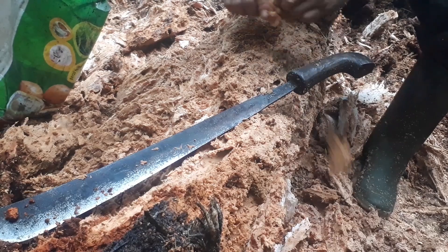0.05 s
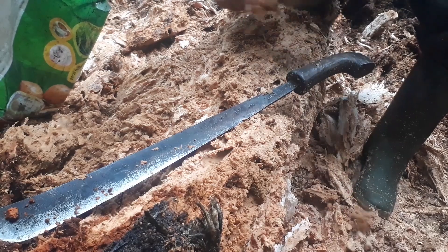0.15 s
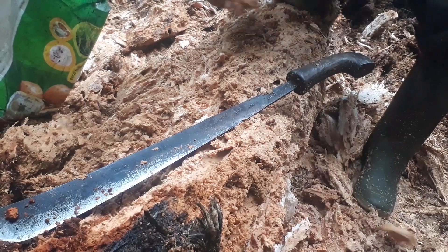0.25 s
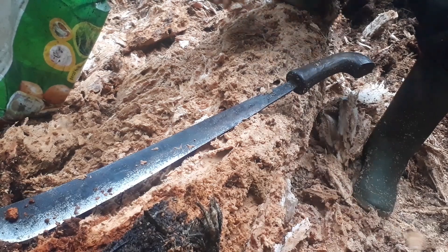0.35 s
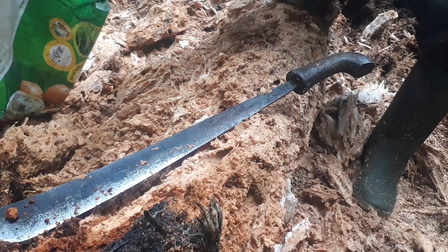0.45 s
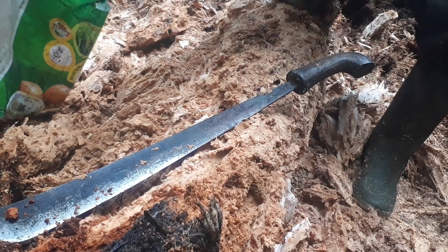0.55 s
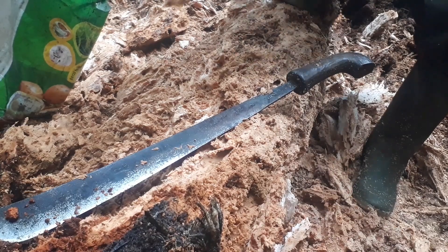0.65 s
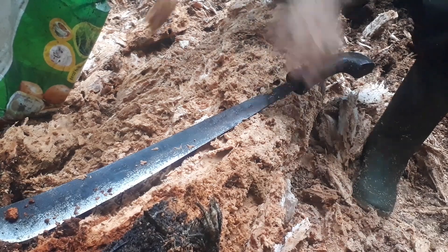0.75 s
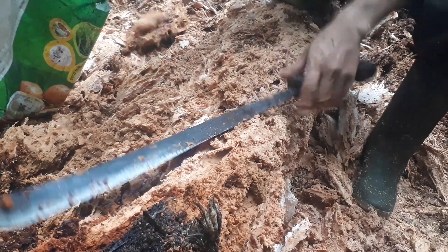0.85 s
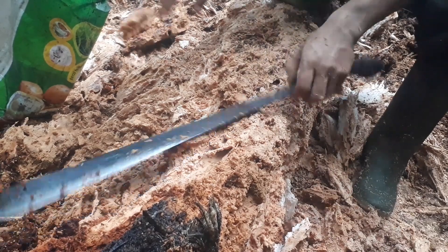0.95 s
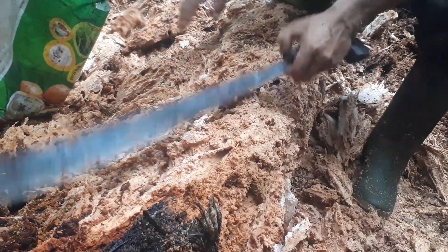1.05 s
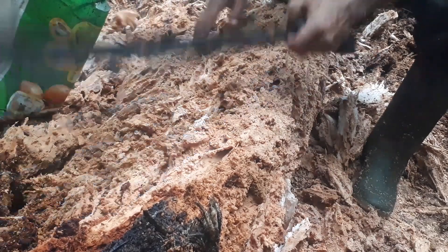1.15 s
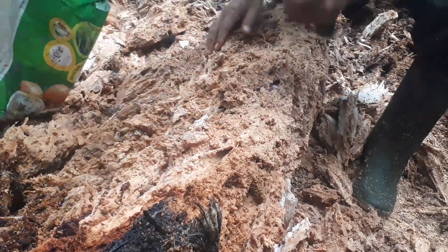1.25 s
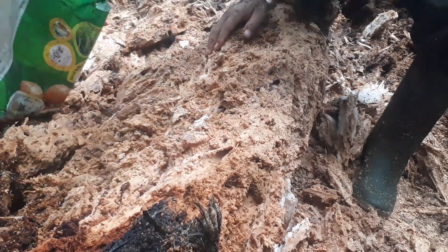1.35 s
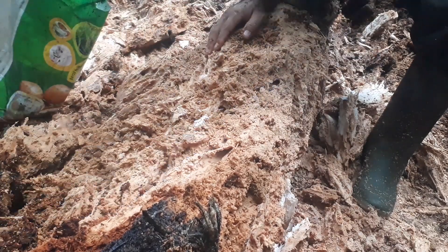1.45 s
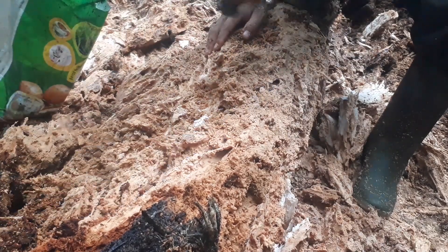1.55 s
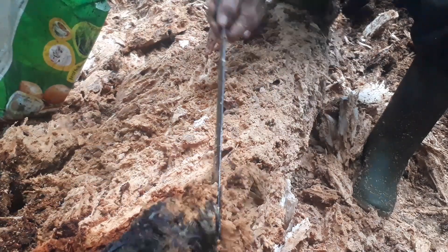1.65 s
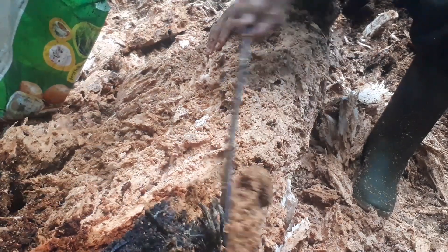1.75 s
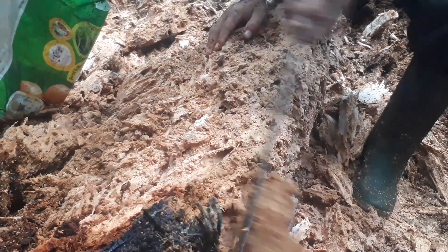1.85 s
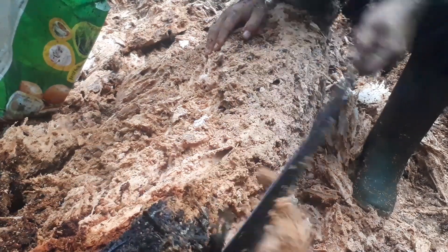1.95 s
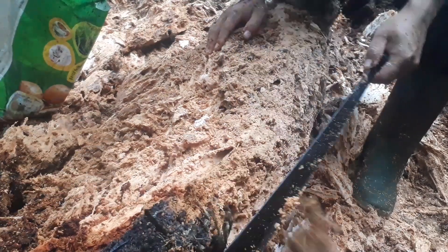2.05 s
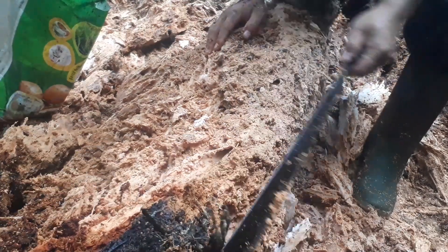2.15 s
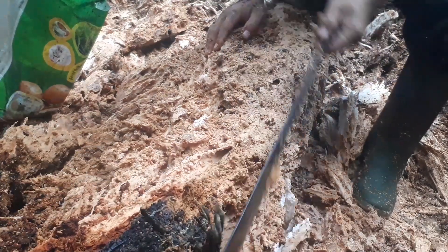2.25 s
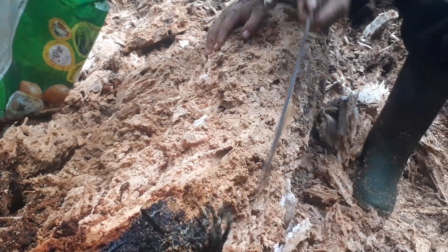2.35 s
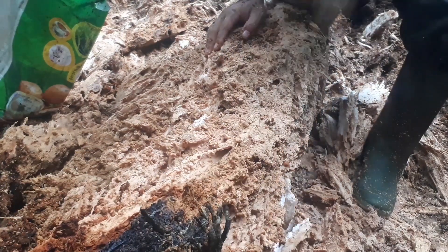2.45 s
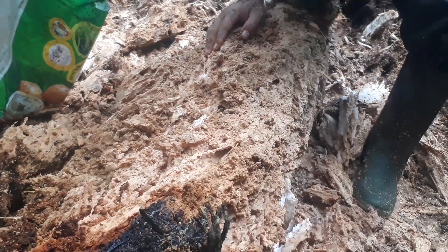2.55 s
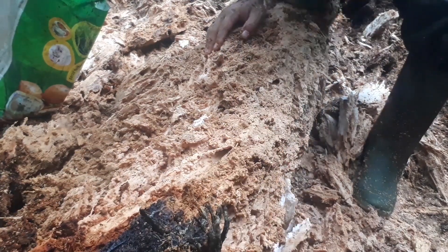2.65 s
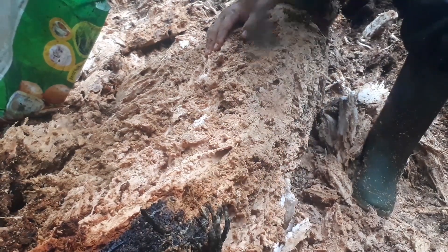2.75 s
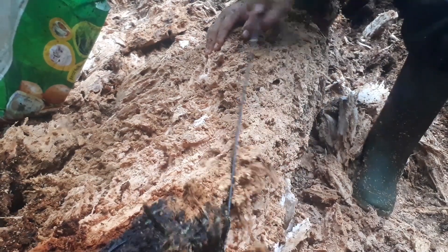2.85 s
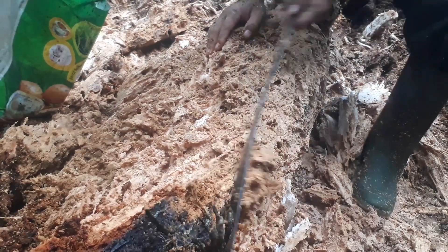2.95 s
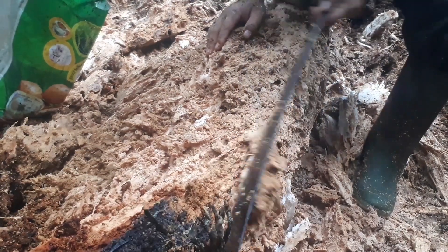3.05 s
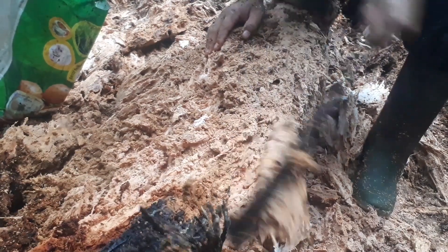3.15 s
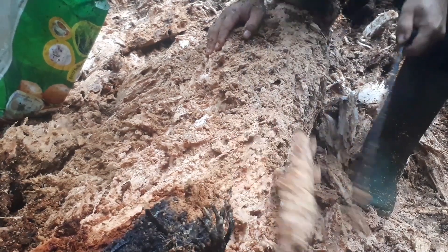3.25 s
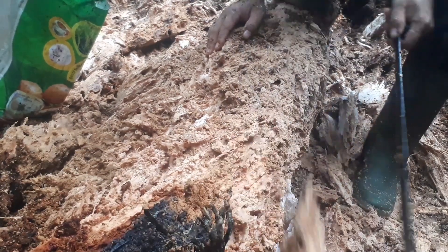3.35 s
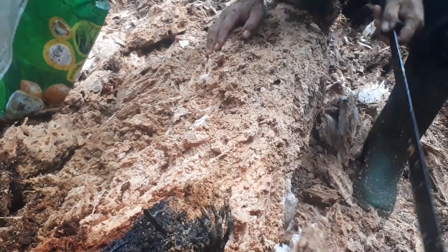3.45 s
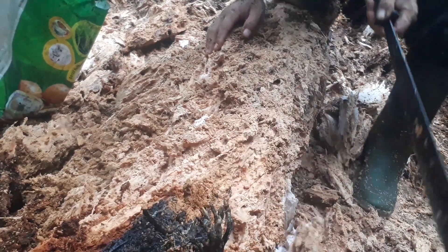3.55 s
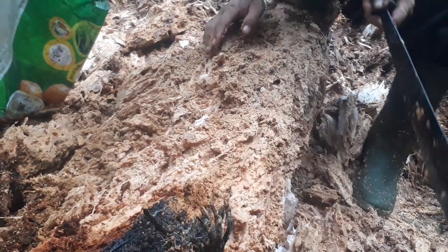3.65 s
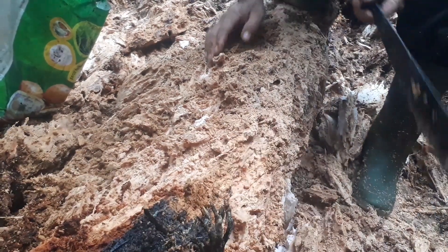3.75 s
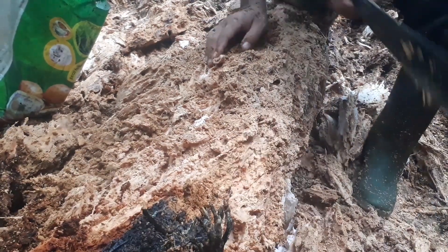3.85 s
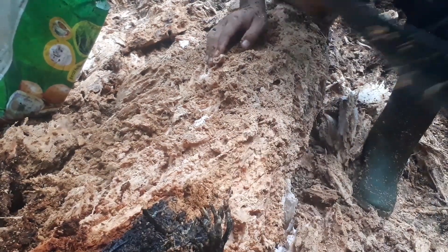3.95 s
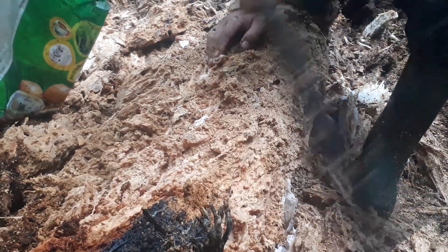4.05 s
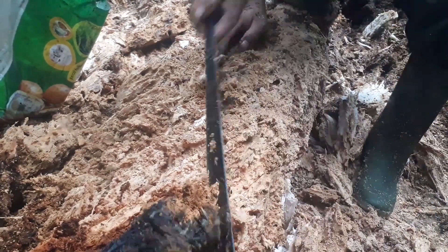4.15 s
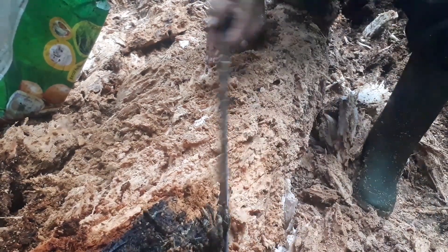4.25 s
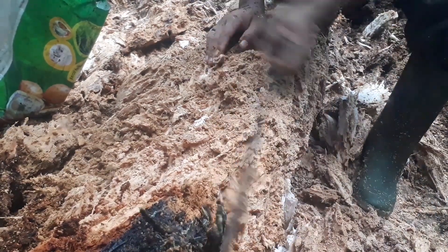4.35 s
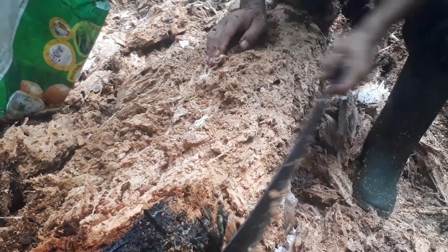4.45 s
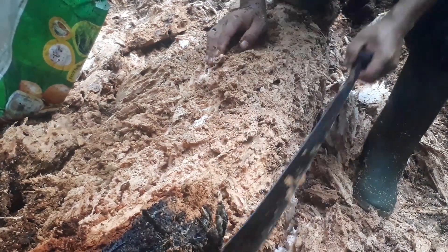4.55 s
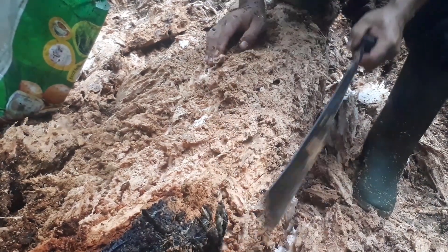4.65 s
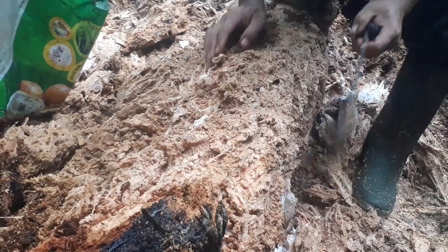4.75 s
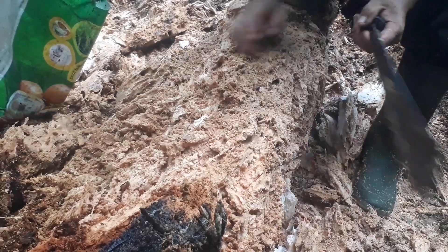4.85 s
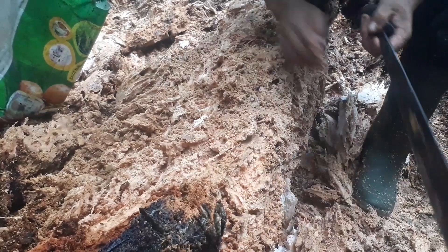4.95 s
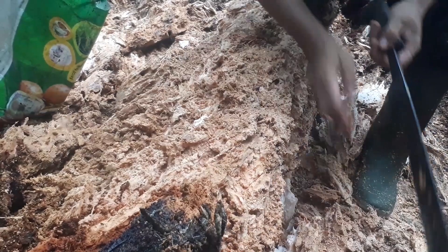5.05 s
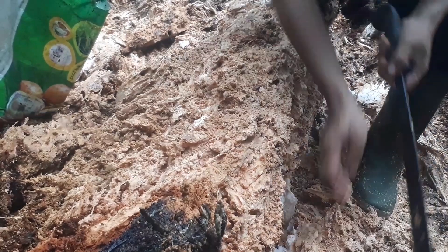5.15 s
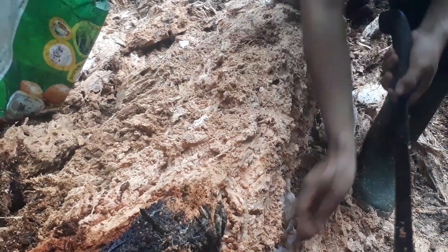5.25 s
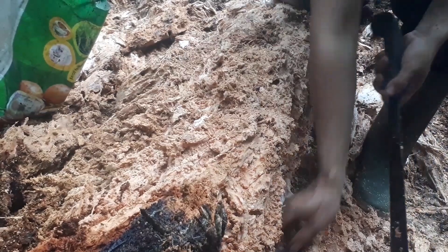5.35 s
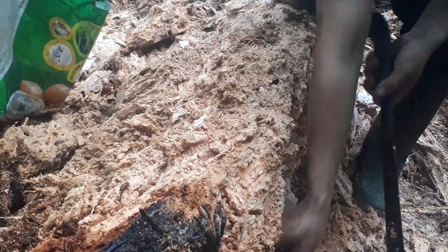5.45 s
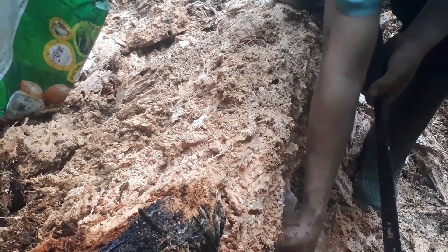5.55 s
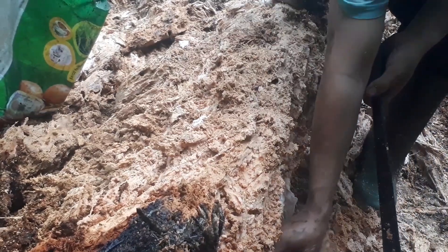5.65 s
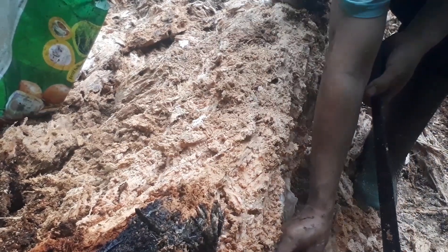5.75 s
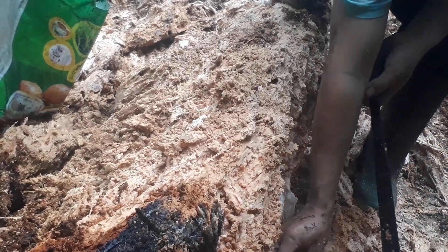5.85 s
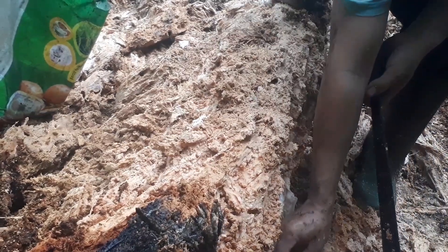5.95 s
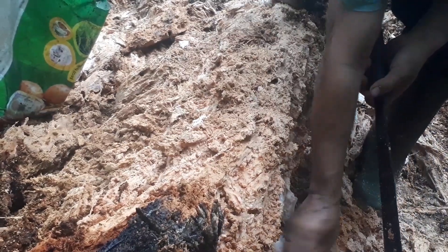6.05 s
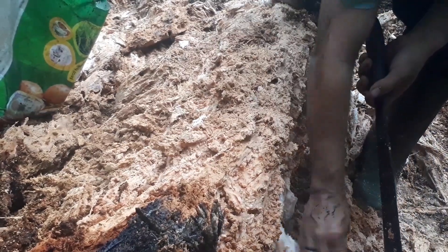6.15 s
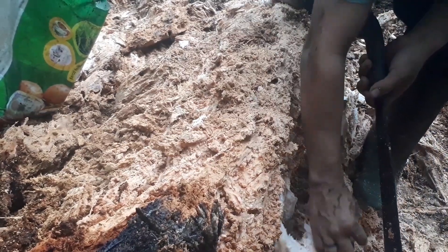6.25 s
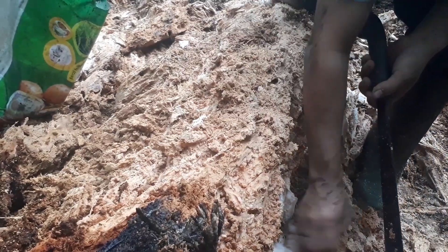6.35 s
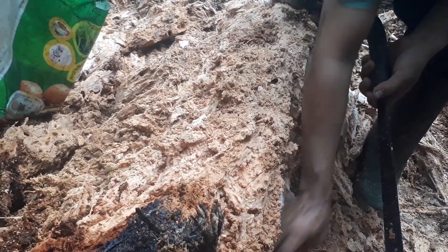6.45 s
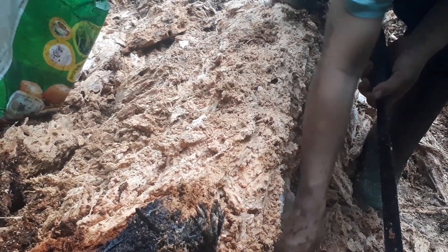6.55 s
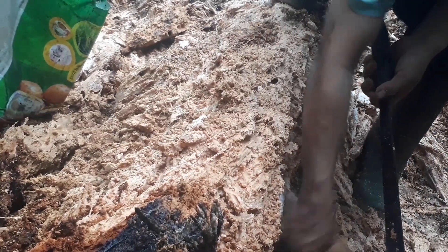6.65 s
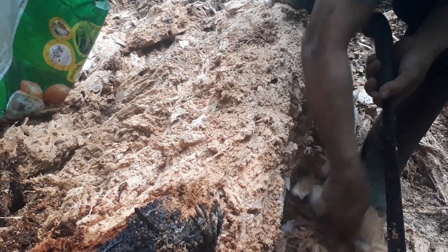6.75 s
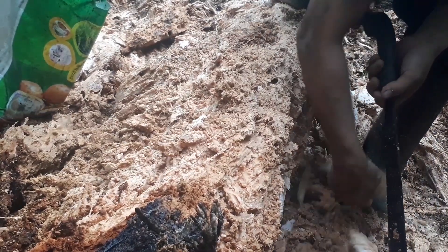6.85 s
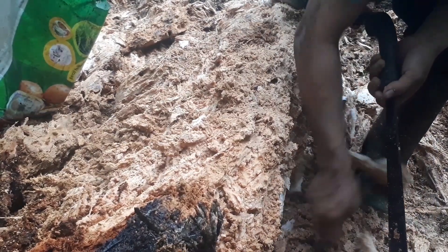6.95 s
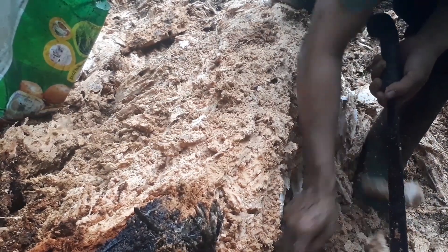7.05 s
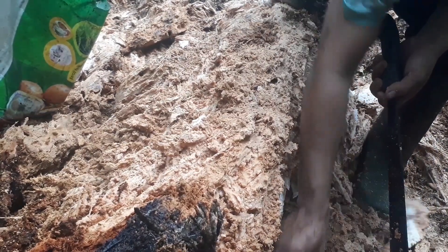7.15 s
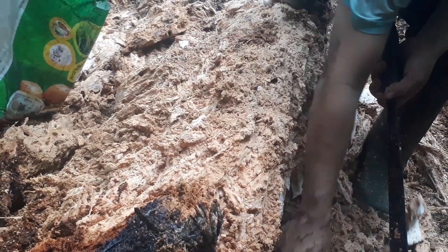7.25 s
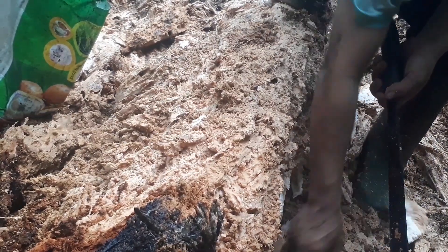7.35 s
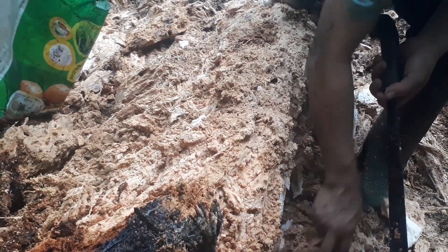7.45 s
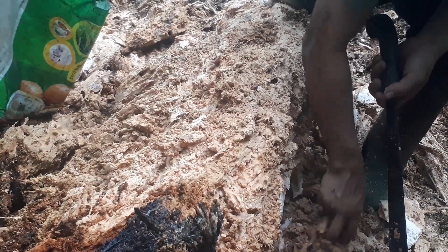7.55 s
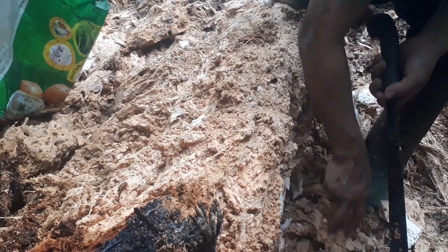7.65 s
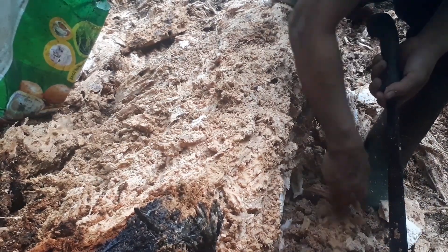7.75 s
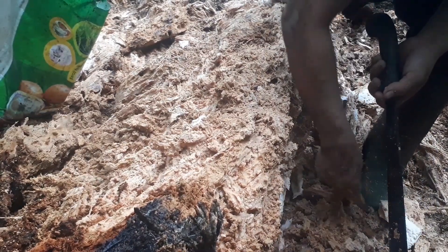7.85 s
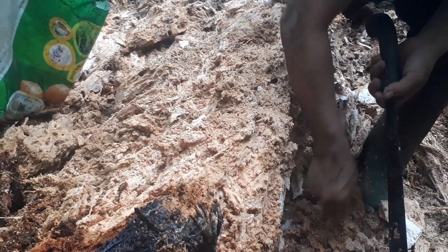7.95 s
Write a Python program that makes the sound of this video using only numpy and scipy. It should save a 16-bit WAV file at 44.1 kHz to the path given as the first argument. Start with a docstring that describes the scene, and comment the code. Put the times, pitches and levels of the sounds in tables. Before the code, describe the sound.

Close stereo pickup of soggy trunk being cut. Three short, squelchy chops come a little over a second apart, each ending in a low damped thump. Levering after the first two breaks fibres in dense dry-edged cracks; the last barely crackles. Small debris ticks before and between, and soft crumbling, rubbing and light bumps follow. A quiet forest wash, fine drips and a thin shrill insect band lie behind, with little echo.

```python
"""Wet forest: a machete is driven three times into a rotten palm trunk and levered until the fibres snap.
Chops are shaped noise plus damped trunk modes; snaps are cracks with short knocks; tearing is dense grains.
Ticks and bumps of debris, a hand rummaging (swelling grains) and scraping (narrow resonance) surround them.
Behind lie a filtered-noise wash with fine drips, a high insect band and one faint far tone."""
import sys
import numpy as np
from scipy import signal
from scipy.fft import rfft, irfft, next_fast_len
from scipy.io import wavfile

SR = 44100
rng = np.random.default_rng(int(sys.argv[2]) if len(sys.argv) > 2 else 0)


def master(y):
    """Save y as 16-bit WAV."""
    cut = np.clip(np.atleast_2d(y).T, -1, 1)
    pcm = np.round(cut * 32767)  # scale
    wavfile.write(sys.argv[1], SR, pcm.astype(np.int16))


N = 351918
TIME = np.arange(N) / SR

# blade sinks in: (time [s], length [s], crunch [dB], entry pitch [Hz], rest pitch [Hz], fizz [dB],
# blade ring re drag [dB], thud time [s], thud [dB], thud pitch [factor])
CHOP_EVENTS = [(1.7001, .021, -24, 1820, 1140, -38.5, -27, 1.7145, -22.5, 0.986),
               (2.8486, 0.014, -24, 2360, 1120, -33.5, -24, 2.858, -22, 1.07),
               (4.198, .013, -26, 2020, 1520, -35, -31.5, 4.2075, -21.5, 0.984)]
# levering after each chop: (pith gives at [s], tearing goes on for [s], tearing [dB before trim],
# build-up [dB/s], crumb trickle [dB before trim])
PRY_EVENTS = [(1.866, 0.025, -32, 270, -41.5), (3.03, .15, -37.5, 258, -58.5),
              (4.388, 0.0064, -43.5, 900, -47.5)]
# thick fibres break: (time [s], knock [dB before trim], knock pitch [Hz], crack [dB before trim])
SNAP_EVENTS = [(1.8097, -28, 1540, -58), (1.8346, -26, 1280, -43), (1.838, -21, 1290, -41),
               (1.8511, -22.5, 1300, -48), (1.8612, -17, 4870, -36), (1.8634, -16, 1620, -38),
               (1.8756, -16, 4800, -33), (1.8892, -15.5, 1580, -24.5), (1.9209, -17, 1420, -39),
               (1.927, -22, 2130, -34), (1.9481, -17.5, 1670, -30.5), (1.9869, -23, 1620, -32.5),
               (1.9908, -24, 2190, -42), (1.9956, -21.5, 2150, -35.5), (2.988, -25, 3100, -37),
               (3, -26, 3100, -33), (3.005, -17.5, 3320, -34), (3.0255, -13.5, 3150, -37),
               (3.038, -16, 3200, -27), (3.0474, -30, 3140, -22), (3.0634, -21, 3400, -34),
               (3.0744, -20, 3300, -29), (3.0877, -15, 1290, -22.5), (3.1014, -14.5, 3600, -22),
               (3.1091, -16, 2130, -27), (3.127, -17, 1890, -19.5), (3.1374, -25, 2690, -27),
               (3.1482, -23, 2020, -28.5), (3.1616, -18, 3050, -25), (3.171, -23, 2500, -27.5),
               (3.1791, -33, 1530, -31), (4.3852, -33, 3980, -31.5), (4.3965, -38, 3500, -30.5),
               (4.4201, -34, 4100, -33.5)]
# spectrum of splitting fizz and bright tick edges: (frequency [Hz], relative level [dB])
FIZZ_SPECTRUM = [(1200, 0.5), (2500, 8), (4500, 3.5), (6500, 0), (10000, 2.5), (15500, -9)]
# spectrum of torn pith: (frequency [Hz], relative level [dB])
PITH_SPECTRUM = [(40, -32), (120, -19), (250, -2.5), (450, -5.5), (650, 0), (1500, 0.5), (3200, 0.5),
                 (4500, -6.5), (7000, -10.5), (12000, -11.5), (16000, -22)]
# spectrum of crumbs and drips: (frequency [Hz], relative level [dB])
CRUMBLE_SPECTRUM = [(500, -21), (1500, -6), (2600, 1), (4000, -7), (6000, -12), (12000, -12.5),
                    (16000, -22.5)]
# spectrum of dull rubbing: (frequency [Hz], relative level [dB])
RUB_SPECTRUM = [(120, -17.5), (300, -1), (480, -15.5), (640, 3), (900, -2.5), (1400, 1), (2000, -5),
                (4000, -36.5)]
# left-right likeness of far sounds: (frequency [Hz], likeness [0-1])
FAR_LIKENESS = [(60, 0.56), (250, 0.84), (640, 0.37), (1400, 0), (3000, 0), (8000, 0.21)]


def gain_of(db):
    """Decibels to amplitude."""
    return 10 ** (np.asarray(db) / 20)


def evened(x):
    """Scales to rms 1."""
    return x / np.sqrt(np.mean(x ** 2) + 1e-20)


def read(points, hz):
    """Interpolates a table on a logarithmic frequency axis."""
    f, value = np.transpose(points)
    return np.interp(np.log(hz + 1), np.log(f + 1), value)


def add(mix, s, sound):
    """Mixes a sound in at time s, cut at the end of the mix."""
    part = mix[:, max(round(s * SR), 0):][:, :sound.shape[-1]]
    part += sound[..., :part.shape[1]]


def high_pass(x, hz):
    """Second-order removal of the bass below hz."""
    return signal.sosfilt(signal.butter(2, hz, "highpass", fs=SR, output="sos"), x)


def colour(x, spectrum):
    """Minimum-phase filter of unit energy with the given spectrum."""
    size = 2048
    log_gain = np.log(gain_of(read(spectrum, abs(np.fft.fftfreq(size, 1 / SR)))))
    taps = np.fft.ifft(np.exp(np.conj(signal.hilbert(log_gain)))).real
    return signal.oaconvolve(x, taps[None] / np.linalg.norm(taps), axes=1)[:, :x.shape[1]]


def resonate(x, hz, width_hz):
    """One-pole resonance in a rotating frame, so that its pitch can move."""
    turn = np.exp(2j * np.pi * np.cumsum(hz * np.ones(x.shape[1])) / SR)
    r = np.exp(-np.pi * width_hz / SR)
    return (turn * signal.lfilter([1 - r], [1, -r], x / turn)).real


def pair(x, likeness):
    """Blends two unrelated signals into left and right that are partly alike."""
    size = next_fast_len(x.shape[1])
    same = np.clip(read(likeness, np.fft.rfftfreq(size, 1 / SR)), 0, .995)
    mid, side = rfft(x, size)
    side = side * np.sqrt((1 - same) / (1 + same))
    return irfft([mid + side, mid - side], size)[:, :x.shape[1]]


def hiss(size, likeness=None):
    """White noise at the two microphones, near unless a likeness is given."""
    # left-right likeness of near sounds: (frequency [Hz], likeness [0-1])
    near_likeness = [(200, .99), (700, .98), (1300, .95), (2500, .82), (5000, .62), (12000, .52)]
    return pair(rng.standard_normal((2, size)), near_likeness if likeness is None else likeness)


def drift(size, per_s):
    """Random wander of rms 1: straight lines between per_s random knots a second."""
    knots = rng.standard_normal(int(size / SR * per_s) + 4)
    return evened(np.interp(np.arange(size) / SR * per_s, np.arange(len(knots)), knots))


def grains(per_s, spread_db, life_s):
    """Tiny noise bursts at random moments, mostly small and a few large."""
    sizes_db = spread_db * np.minimum(rng.exponential(1, N), 3.5)
    clicks = (rng.random(N) < per_s / SR) * gain_of(sizes_db)
    power = signal.lfilter([1], [1, -np.exp(-2 / (life_s * SR))], clicks ** 2)
    return evened(np.sqrt(power)) * hiss(N)


def swell(peak_s, length_s, rise=0.46):
    """Smooth rise (a share of the length) and fall: 1 at the peak, about 9 dB down at the ends."""
    after = (TIME - peak_s) / length_s
    return np.exp(-np.minimum((after / np.where(after < 0, rise, 1 - rise)) ** 2, 20))


def held(s, hold_s, rise_db_per_s, fall_db_per_s):
    """Envelope that builds up to 1 at time s, holds, and dies away."""
    before_s = np.maximum(s - TIME, 0)
    after_s = np.maximum(TIME - s - hold_s, 0)
    return gain_of(-rise_db_per_s * before_s - fall_db_per_s * after_s)


def forest(wash_db=-63, waver_db=1.34, drip_db=-73):
    """Distant wash of wavering coloured noise, and fine drizzle on leaves as sparse grains."""
    # spectrum of the wash: (frequency [Hz], relative level [dB])
    wash_spectrum = [(20, -12), (50, -6.5), (110, 3.5), (200, -3.5), (480, -6), (900, -7), (1400, -2.5),
                     (1700, -7), (2050, -1.5), (3000, -5), (5000, -9.5), (11500, -14.5), (14000, -18),
                     (16000, -35)]
    wash = colour(hiss(N, FAR_LIKENESS), wash_spectrum) * gain_of(wash_db + waver_db * drift(N, per_s=7))
    drops = grains(per_s=120, spread_db=3, life_s=.001)
    return wash + gain_of(drip_db) * colour(drops, CRUMBLE_SPECTRUM)


def insects(chorus_db=-64.5, rest_db=-1.5, shrill_db=-68, shrill_hz=9170, sag_hz=400):
    """High band of many insects; the shrillest sag in pitch as the chorus eases off, and slowly recover."""
    # spectrum of the chorus: (frequency [Hz], relative level [dB])
    chorus_spectrum = [(6000, -35.5), (6850, -15), (7080, -1.5), (7300, -7), (7700, 0), (8150, 1),
                       (8600, -1), (9000, -2), (9250, -7), (9420, -12), (9600, -20), (10500, -40)]
    # insects ease off: (deepest at [s], length [s])
    rests = [(.2, 1.05), (4.25, 1.05)]
    rest = sum(swell(s, length_s, rise=0.28) for s, length_s in rests)
    chorus = gain_of(chorus_db) * colour(hiss(N, FAR_LIKENESS), chorus_spectrum)
    shrill = hiss(N, FAR_LIKENESS)
    for _ in range(3):  # cascade steepens the skirts
        shrill = resonate(shrill, shrill_hz - sag_hz * rest, width_hz=560)
    level = gain_of(rest_db * rest + 0.83 * drift(N, per_s=28))
    return (chorus + gain_of(shrill_db) * evened(shrill)) * level


def thud(pitch, push_s=0.0023):
    """The damp trunk is pushed away and swings in its low, damped modes."""
    # trunk modes: (frequency at pitch factor 1 [Hz], level [dB], t60 [s])
    trunk_modes = [(76, -20.5, 0.15), (140.3, -4, 0.078), (162, -6.5, 0.065), (195.6, -6.5, 0.085),
                   (278, -1.5, 0.069), (342, -8.5, 0.1), (378, -6, 0.057), (563, -13, 0.039)]
    t = np.arange(SR // 4) / SR
    modes = sum(gain_of(db - 60 * t / t60_s) * np.sin(2 * np.pi * hz * pitch * t)
                for hz, db, t60_s in trunk_modes)
    return high_pass(-modes * (1 - np.exp(-t / push_s)), 55)


def debris(dull_db=-12):
    """Crumbs and twigs tick (decaying resonant noise); heavier chunks bump softly (slow-pushed thuds)."""
    # crumbs and twigs: (time [s], level [dB], pitch [Hz], t60 [s], bright edge re level [dB])
    ticks = [(.309, -47.5, 2900, 0.063, -10), (0.4386, -40, 2680, 0.042, -14),
             (.622, -32.5, 2620, 0.026, -5), (1.3266, -49.5, 2780, 0.058, -6),
             (2.888, -38, 2200, 0.022, -3), (4.463, -47.5, 1600, 0.064, -6), (5.32, -48.5, 1890, 0.085, 5),
             (5.746, -44, 7100, 0.015, -11), (6.586, -52, 1270, 0.05, 0), (6.83, -56, 6200, 0.072, 3),
             (6.975, -53, 2190, .046, -9), (7.193, -53.5, 1090, 0.13, -12), (7.709, -48, 2590, 0.02, 2),
             (7.852, -46, 860, 0.07, -3.5), (7.895, -42.5, 1120, 0.031, -5)]
    # chunks land, the hand bumps the heap: (time [s], level [dB], pitch [factor])
    bumps = [(0.626, -50, 1.34), (3.471, -50, 1), (5.322, -39, 1.05), (5.352, -49, 1.4), (6.367, -48, 1.13),
             (6.581, -49, 0.98), (6.999, -48.5, 1.11), (7.142, -47, 0.62), (7.213, -49, .68)]
    out, t = np.zeros((2, N)), np.arange(SR // 8) / SR
    for s, db, hz, t60_s, bright_db in ticks:
        body = evened(high_pass(resonate(hiss(len(t)), hz, width_hz=0.25 * hz), hz / 2))
        edge = colour(hiss(len(t)), FIZZ_SPECTRUM)
        dull = colour(hiss(len(t)), RUB_SPECTRUM)
        tick = body + gain_of(bright_db) * edge + gain_of(dull_db) * dull
        add(out, s, gain_of(db - 60 * t / t60_s) * tick)
    for s, db, pitch in bumps:
        add(out, s, gain_of(db) * thud(pitch, push_s=0.0062))
    return out


def rummaging(crumble_trim_db=-1, rub_trim_db=-1.0, idle_crumble_db=-70, idle_rub_db=-74,
              clump_db=2.5, flake_db=-7):
    """Loose pith crumbles, rubs and flakes with each stroke; the heap is never quite still."""
    # hand or boot stirs the pith: (strongest at [s], length [s], crumbling [dB before trim],
    # dull rubbing [dB before trim])
    strokes = [(0.344, 0.13, -56.5, -61), (.46, 0.1, -61, -63.5), (.65, 0.11, -56, -59),
               (.83, 0.15, -62, -64), (1.032, 0.044, -63.5, -77), (1.374, 0.13, -62.5, -70),
               (2.428, 0.069, -61.5, -67), (3.277, .2, -62.5, -66.5), (3.477, 0.068, -59.5, -63.5),
               (3.75, 0.14, -58.5, -67), (3.83, 0.059, -63, -66), (3.949, 0.11, -58, -59.5),
               (4.495, .1, -58, -74), (4.952, 0.45, -66.5, -70), (5.327, 0.088, -58, -65),
               (5.62, 0.33, -65, -69), (5.896, 0.14, -63, -63), (6.325, 0.11, -61, -67),
               (6.475, 0.19, -59, -65.5), (6.596, 0.17, -59.5, -61.5), (6.8, 0.23, -61, -65.5),
               (6.96, 0.06, -62, -73), (7.61, 0.079, -65, -66), (7.897, 0.13, -57, -57.5)]
    crumbs = grains(per_s=900, spread_db=2.5, life_s=.001)
    scuffs = grains(per_s=300, spread_db=2.5, life_s=.003)
    flakes = grains(per_s=45, spread_db=1.5, life_s=.002)
    crumble, rub = gain_of(idle_crumble_db), gain_of(idle_rub_db)
    for s, length_s, crumbling_db, rubbing_db in strokes:
        push = swell(s, length_s)
        crumble = np.hypot(crumble, gain_of(crumbling_db + crumble_trim_db) * push)
        rub = np.hypot(rub, gain_of(rubbing_db + rub_trim_db) * push)
    clumps = evened(gain_of(clump_db * drift(N, per_s=35)))
    crumbling = colour(crumbs * clumps + gain_of(flake_db) * flakes, CRUMBLE_SPECTRUM)
    return crumble * crumbling + rub * colour(scuffs, RUB_SPECTRUM)


def chops(cell_db=-4, squelch_db=-3, pulp_db=-6, deep_cut_s=0.021):
    """The blade crushes wet cells; the crunch darkens as it sinks, and it stops with a thud."""
    # spectrum of crushed cells: (frequency [Hz], relative level [dB])
    crunch_spectrum = [(150, -36), (350, 23), (480, -14.5), (720, 12), (900, -6), (1300, -0.5),
                       (2300, -1.5), (4000, -21.5), (7000, -30)]
    # buried blade, damped by the pith: (frequency [Hz], width [Hz], level [dB])
    blade_modes = [(684, 65, 3), (1130, 110, 3.5), (1250, 51, -7), (1565, 51, -4.5), (2070, 74, -2),
                   (2830, 86, -6.5)]
    out, t = np.zeros((2, N)), np.arange(SR // 12) / SR
    for s, length_s, db, entry_hz, rest_hz, fizz_db, ring_db, stop_s, thud_db, pitch in CHOP_EVENTS:
        depth = t / length_s
        # resistance grows with depth, fizz follows the speed, deep pulp is squeezed last
        press = gain_of(np.interp(depth, [0, .25, .65, .9, 1.25, 2.5], [-14, -9.5, 1.5, -8.5, -25, -65]))
        split = gain_of(np.interp(depth, [0, .12, .65, 1.1, 2, 4], [-10, 0.5, 0.5, -6.5, -17, -24]))
        squeeze = gain_of(np.interp(depth, [0, .5, .9, 1.3, 2.5], [-30, -13.0, -1.5, -10.5, -39]))

        squelch_hz = np.interp(depth, [0, 1], [entry_hz, rest_hz])
        squelch = high_pass(evened(resonate(hiss(len(t)), squelch_hz, width_hz=320)), 950)
        cells = evened(high_pass(colour(hiss(len(t)), crunch_spectrum), 720))
        crunch = gain_of(cell_db) * cells + gain_of(squelch_db) * squelch
        pulp_hz = np.interp(depth, [.5, 1.2], [700, 380])
        pulp = evened(high_pass(resonate(hiss(len(t)), pulp_hz, width_hz=80), 150))
        pulp_gain = gain_of(pulp_db) * (length_s / deep_cut_s) ** 2  # longer cuts squeeze more
        add(out, s, gain_of(db) * (press * crunch + pulp_gain * squeeze * pulp))

        drag = hiss(len(t)) * press
        ring = sum(gain_of(mode_db) * evened(resonate(drag, hz, width_hz))
                   for hz, width_hz, mode_db in blade_modes)
        ring_gain = gain_of(ring_db) * drag.std()
        fizz = evened(colour(hiss(len(t)) * gain_of(1.2 * drift(len(t), per_s=580)), FIZZ_SPECTRUM))
        add(out, s, gain_of(fizz_db) * split * fizz + ring_gain * evened(high_pass(ring, 500)))
        add(out, stop_s, gain_of(thud_db) * thud(pitch))
    return out


def strain(release_db_per_s=620):
    """How hard the pith is tearing as the blade levers it; it stops fast."""
    return sum(gain_of(db) * held(s, hold_s, rise, release_db_per_s)
               for s, hold_s, db, rise, trickle_db in PRY_EVENTS)


def tearing(trim_db=-2.0, onset_db_per_s=900, clump_db=3.0, settle_db=-24, settle_after_s=0.041,
            settle_db_per_s=142, trickle_db_per_s=86):
    """Dense small crackle as each cut creaks shut, while the pith gives way, and as crumbs trickle after."""
    crackle = grains(per_s=1800, spread_db=2, life_s=.0005)
    crackle = crackle * evened(gain_of(clump_db * drift(N, per_s=160)))
    # settling is relative to the crunch level of its chop
    settle = sum(gain_of(db + settle_db) * held(s + settle_after_s, 0, onset_db_per_s, settle_db_per_s)
                 for s, length_s, db, *_ in CHOP_EVENTS)
    trickle = sum(gain_of(trickle_db) * held(s + hold_s, 0, onset_db_per_s, trickle_db_per_s)
                  for s, hold_s, db, rise, trickle_db in PRY_EVENTS)
    level = np.sqrt(strain() ** 2 + settle ** 2 + trickle ** 2)
    return gain_of(trim_db) * colour(crackle, PITH_SPECTRUM) * level


def second_halves(delay_s=.0021, octaves=0.35, knock_db=-7, crack_db=-9.5):
    """A thick fibre goes in two stages: its weaker other half follows at once, a little off pitch."""
    chance = rng.uniform(-1, 1, (len(SNAP_EVENTS), 2))
    rows = []
    for (s, db, hz, sharp_db), (late, detune) in zip(SNAP_EVENTS, chance):
        half_s = s + delay_s * (1 + .3 * late)
        rows.append((half_s, db + knock_db, hz * 2 ** (octaves * detune), sharp_db + crack_db))
    return rows


def thin_fibres(gap_s=.009, lead_s=.02, knock_db=6.0, crack_db=1.0, spread_db=2.0,
                middle_hz=2300, octaves=0.49):
    """Thin fibres break at uneven intervals, as hard as the strain: rows like those of the thick ones."""
    force, rows = strain(), []
    for s, hold_s, *_ in PRY_EVENTS:
        wait, knock, crack, pitch = np.clip(rng.standard_normal(size=(40, 4)), -2, 2).T
        times = s - lead_s + np.cumsum(gap_s * np.exp(.5 * wait))
        db = 20 * np.log10(np.interp(times, TIME, force) + 1e-9)
        knocks_db = db + knock_db + spread_db * knock
        cracks_db = db + crack_db + spread_db * crack
        fibres = np.transpose([times, knocks_db, middle_hz * 2 ** (octaves * pitch), cracks_db])
        rows += list(fibres[times < s + hold_s + lead_s])
    return rows


def snaps(ring_cycles=2.27, crack_life_s=0.00066, knock_trim_db=1, crack_trim_db=4.0, spike=1.6,
          scatter_db=-19, scatter_life_s=0.006, trunk_db=-27.5):
    """Each fibre cracks, kicks the pith into a few damped cycles, shakes neighbours and nudges the trunk."""
    # spectrum of a breaking fibre: (frequency [Hz], relative level [dB])
    crack_spectrum = [(50, -37), (200, -18), (500, -6), (1500, 2), (3200, 2), (5000, 7), (7000, 3),
                      (12000, 1), (16000, -2.5)]
    out, t = np.zeros((2, N)), np.arange(SR // 25) / SR
    for s, db, hz, sharp_db in SNAP_EVENTS + second_halves() + thin_fibres():
        knock = high_pass(-np.sin(2 * np.pi * hz * t) * np.exp(-t * hz / ring_cycles), 600)
        splinters = hiss(len(t)) * np.exp(-t / crack_life_s)
        crack = colour(splinters - spike * (t == 0), crack_spectrum)  # one clean break, then splinters
        scatter = colour(hiss(len(t)) * np.exp(-t / scatter_life_s), PITH_SPECTRUM)
        sides = gain_of(rng.normal(.1, 1.0) * np.array([[1], [-1]]))  # random left-right lean
        body = gain_of(db) * (gain_of(knock_trim_db) * knock + gain_of(scatter_db) * scatter)
        add(out, s, sides * (body + gain_of(sharp_db + crack_trim_db) * crack))
        add(out, s, gain_of(db + trunk_db) * high_pass(thud(rng.uniform(1.03, 1.494)), 230))
    return out


def scraping(width_hz=130):
    """Faint hollow scrapes, two at a steady pitch and one gliding down: finger slips ring a hollow in the pith."""
    # scrapes: (strongest at [s], length [s], level [dB], pitch at the peak [Hz], glide [Hz/s])
    scrapes = [(4.88, .25, -68, 1400, 0), (5.81, 0.57, -67, 920, -500), (6.58, 0.28, -64.5, 860, 0)]
    slips = grains(per_s=400, spread_db=2.5, life_s=.002)
    out = np.zeros((2, N))
    for s, length_s, db, hz, glide in scrapes:
        pitch_hz = hz + glide * np.clip(TIME - s, -length_s, length_s)
        hollow = evened(high_pass(resonate(slips, pitch_hz, width_hz), hz / 2))
        out += gain_of(db) * swell(s, length_s) * hollow
    return out


def far_tone(peak_s=6.74, length_s=.36, db=-70, hz=294, rise_hz_per_s=50):
    """A brief, thin tone from far away: unsteady harmonics rising a little in pitch."""
    # partials: (multiple of the pitch, relative level [dB])
    partials = [(1, 0), (2, 4.5), (3, 1.5), (5, -9)]
    pitch_hz = hz + rise_hz_per_s * np.clip(TIME - peak_s, -length_s, length_s)
    turns = np.cumsum(pitch_hz * (1 + 0.0037 * drift(N, per_s=47))) / SR
    tone = sum(gain_of(part_db + 2 * drift(N, per_s=26)) * np.sin(2 * np.pi * round(k) * turns)
               for k, part_db in partials)
    return gain_of(db) * swell(peak_s, length_s, rise=0.52) * evened(tone)


def surroundings(x):
    """Trunks and leaves scatter a thin tail: convolution with decaying noise."""
    # decay of the tail: (frequency [Hz], t60 [s])
    tail_decay = [(150, 0.45), (1000, 0.43), (3000, 0.31), (8000, 0.43), (15000, 0.052)]
    hz, t, z = signal.stft(rng.standard_normal((2, SR // 2)), SR, nperseg=256)
    decay = gain_of(-60 * t / read(tail_decay, hz)[:, None])
    onset = 1 - np.exp(-t / 0.0029)
    tail = signal.istft(z * decay * onset, SR, nperseg=256)[1]
    tail = pair(tail, FAR_LIKENESS)
    return signal.fftconvolve(x.mean(0)[None], tail / np.linalg.norm(tail[0]), axes=1)[:, :N]


def scene(echo_db=-22, lean_db=0.36):
    """The work at the trunk, slightly left of centre, in the open forest."""
    # ground and log throw sound straight back: (delay [s], level [dB])
    reflections = [(.0021, -24), (.0046, -24)]
    far = forest() + insects() + far_tone()
    work = debris() + rummaging() + chops() + tearing() + snaps() + scraping()
    work = work * gain_of([[lean_db], [-lean_db]])
    mix = work + gain_of(echo_db) * surroundings(work) + far
    for delay_s, db in reflections:
        add(mix, delay_s, gain_of(db) * work)
    return mix


def record(dry, bass_hz=62, edge_hz=15850):
    """The small microphones lose the deep bass; then a low-pass limits the band."""
    edge = signal.firwin(301, edge_hz, window=("kaiser", 8), fs=SR)
    return signal.oaconvolve(high_pass(dry, bass_hz), edge[None], "same")


dry = scene()
out = record(dry)
master(out)
```